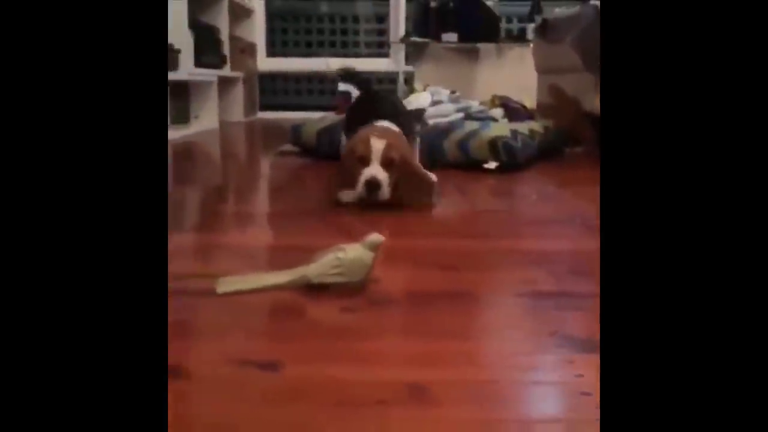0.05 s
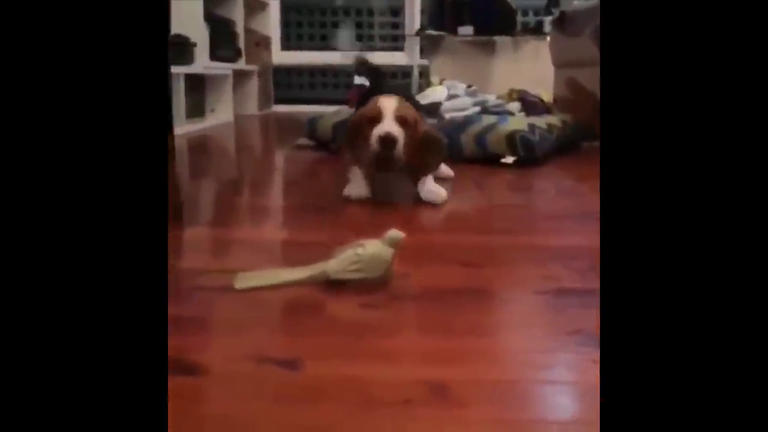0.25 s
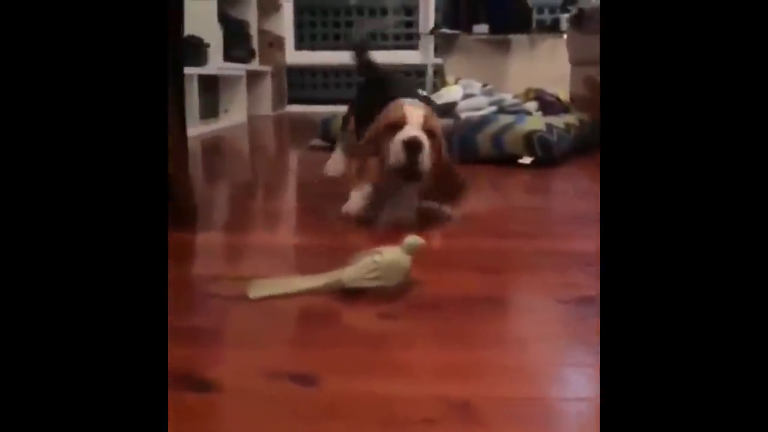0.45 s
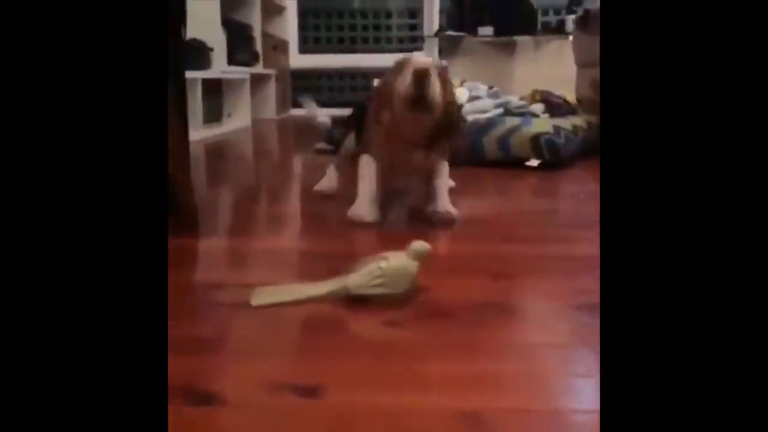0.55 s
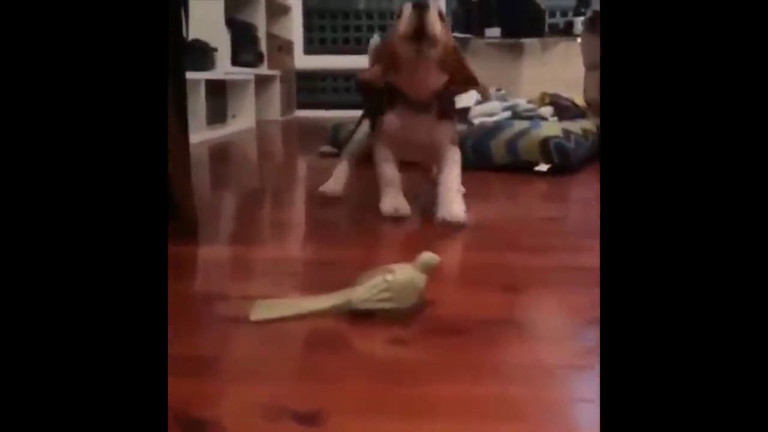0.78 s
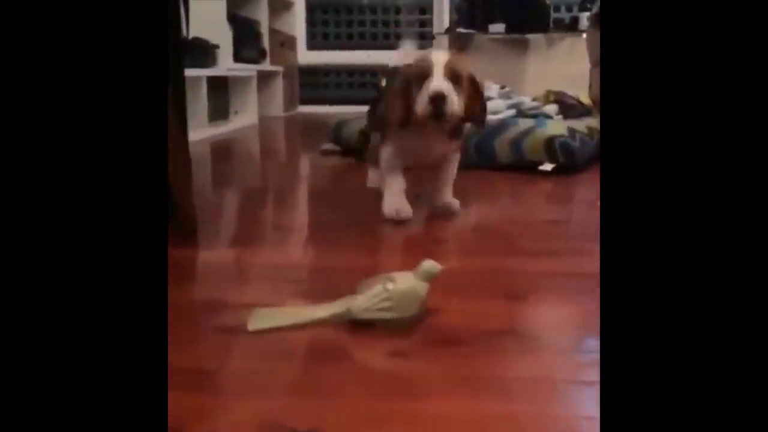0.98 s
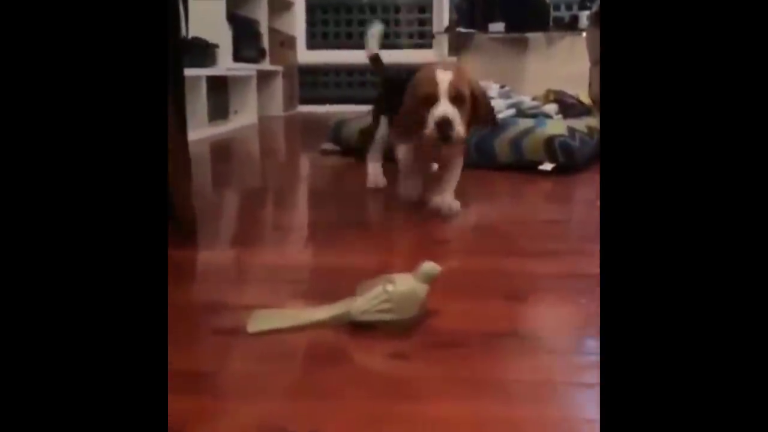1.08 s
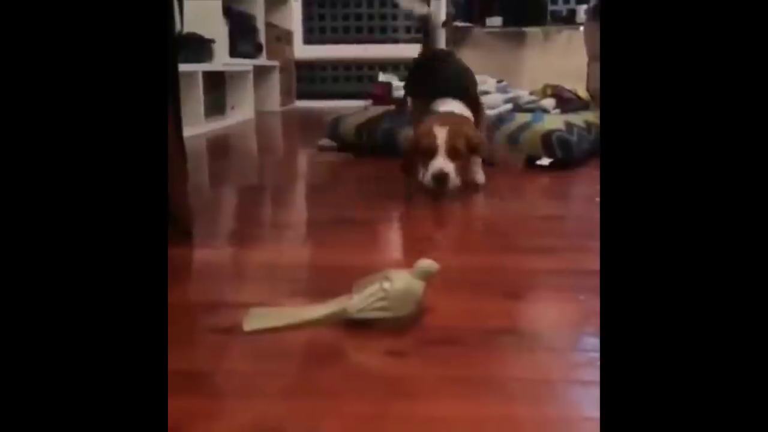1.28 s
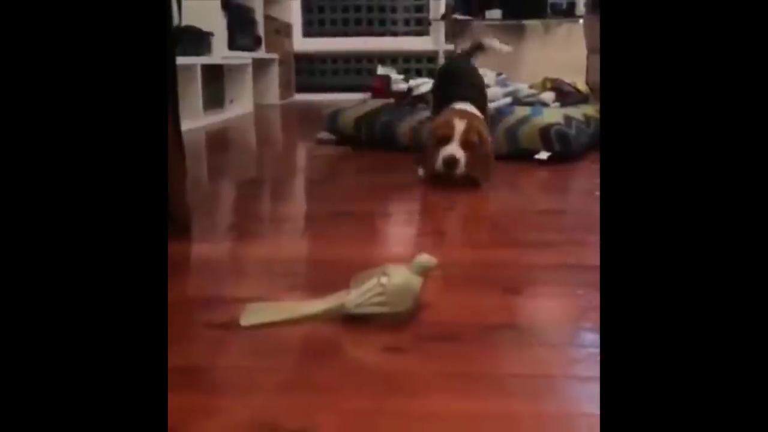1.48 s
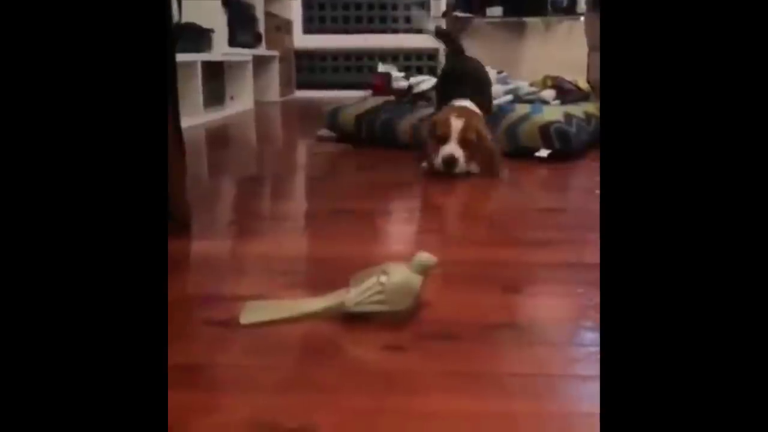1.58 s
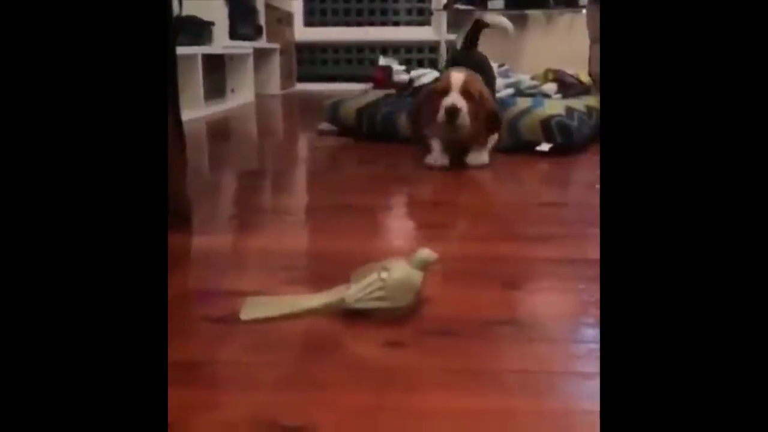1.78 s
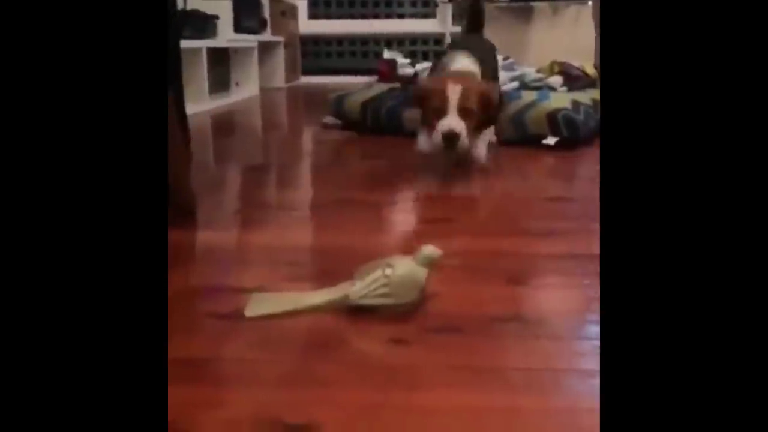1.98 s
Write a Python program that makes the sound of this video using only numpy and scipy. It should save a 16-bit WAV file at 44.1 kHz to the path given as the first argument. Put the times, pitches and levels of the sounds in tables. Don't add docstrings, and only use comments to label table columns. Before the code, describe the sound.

Puppy howl indoors: short gruff woof, loud rough bay sliding down, a sniff, quieter grumbling growls

```python
import sys
import numpy as np
from scipy import signal
from scipy.fft import rfft, irfft
from scipy.io import wavfile
from scipy.ndimage import uniform_filter1d, minimum_filter1d

SR = 44100
rng = np.random.default_rng(int(sys.argv[2]) if len(sys.argv) > 2 else 0)


def generate_wav(signal):
    frames = np.transpose(np.atleast_2d(signal))
    scaled = np.clip(frames, -1, 1) * 32767
    pcm = np.round(scaled).astype(np.int16)
    wavfile.write(sys.argv[1], SR, pcm)


def voltage_ratio(decibels):
    exponent = np.asarray(decibels, float) / 20
    return 10 ** exponent


N = 90404


def curve(table, col):
    rows = np.array(table, float)
    return np.interp(np.arange(N) / SR, rows[:, 0], rows[:, col])


def gate(table, edge=0.057):
    t = np.arange(N) / SR
    return np.clip(np.minimum(t - table[0][0], table[-1][0] - t) / edge + 1, 0, 1)


def read(points, hz):
    f, value = np.transpose(points)
    return np.interp(np.log(hz + 1), np.log(f + 1), value, right=-90)


def evened(x, size=None):
    power = np.mean(x ** 2) if size is None else abs(uniform_filter1d(x ** 2, size))
    return x / np.sqrt(power + 1e-18)


def coloured(points):
    spectrum = rfft(rng.standard_normal(N))
    return evened(irfft(spectrum * voltage_ratio(read(points, np.fft.rfftfreq(N, 1 / SR))), N))


def wobble(hz):
    low_pass = signal.butter(2, hz, fs=SR, output="sos")
    return evened(signal.sosfilt(low_pass, rng.standard_normal(N)))


def resonate(x, hz, width):
    turn = np.exp(2j * np.pi * np.cumsum(hz * np.ones(len(x))) / SR)
    r = np.exp(-np.pi * 1.5 * width / SR)
    smooth = signal.lfilter([(1 - r) ** 2], [1, -2 * r, r * r], x / turn + 1e-18)
    return 2 * (turn * smooth).real


def room_tone():
    # frequency in Hz, level in dB
    hum_colour = [(25, -9), (100, 2.5), (170, -7), (600, -17), (1300, -11), (2200, -28.5), (3300, -28.5),
                  (9300, -37)]
    duck_db = -3.5 * gate([(.5,), (1.15,)], edge=0.15)
    return voltage_ratio(-45 + duck_db + 0.83 * wobble(7.0)) * coloured(hum_colour)


def scuffs():
    # time in seconds, level in dB
    slide = [(0, -32), (.06, -36.5), (.11, -37), (.15, -49.5)]
    # frequency in Hz, level in dB
    slide_colour = [(150, -16.5), (250, -1), (850, -8.5), (1500, -9), (1900, -17), (3300, -18.5),
                    (5500, -26.5), (9300, -30)]
    return gate(slide) * voltage_ratio(curve(slide, 1) + 1.9 * wobble(21.0)) * coloured(slide_colour)


def paws():
    # start in seconds, level in dB, board pitch in Hz
    landings = [(.002, -16, 153.6), (0.051, -22, 97.6), (0.082, -28, 200), (0.128, -26, 95.1),
                (0.245, -18.5, 187), (0.288, -25, 69.3), (0.531, -24.5, 99), (0.648, -24, 190),
                (1.241, -41, 100), (1.508, -32, 179.4), (1.81, -24.5, 108), (1.856, -30.5, 102.6)]
    board_t60_s = 0.11
    out = np.zeros(N + SR)
    t = np.arange(SR // 3) / SR
    for s, db, hz in landings:
        ring = np.sin(2 * np.pi * hz * t)
        ring += 0.41 * np.sin(2 * np.pi * 1.6 * hz * t)
        ring += 0.27 * np.sin(2 * np.pi * 2.5 * hz * t)
        out[round(s * SR):][:len(t)] += voltage_ratio(db - 60 * t / board_t60_s) * np.minimum(t / 0.0034, 1) * ring
    return out[:N]


def growling(rows, hz, throat):
    # time in seconds, lift in dB, length in seconds
    gusts = [(.2, 6.5, 0.0083), (0.232, -0.5, 0.01), (0.279, 5, 0.032), (1.641, 8.5, 0.0072),
             (1.677, 10, 0.023), (1.714, 8, 0.0073), (1.794, 9.5, 0.0095), (1.826, 11, 0.014),
             (1.868, 14, 0.022), (1.944, 8.5, 0.018), (2.001, 8.5, 0.015)]
    jitter, alternation, noise_share = .11, .3, .3
    turns = np.cumsum(hz * (1 + jitter * np.clip(wobble(70.), -2, 2))) / SR
    cycle = turns.astype(int)
    size = (1 - alternation * (cycle % 2)) * rng.uniform(0.53, 1, N)[cycle]
    pulses = np.diff(cycle, prepend=0) * size
    puffs = evened((.7 + np.exp(-(turns % 1) / .3)) * size * rng.standard_normal(N))
    voiced = (1 - noise_share) * evened(pulses - pulses.mean()) + noise_share * puffs
    drift = 1 + .03 * wobble(6.)
    t = np.arange(N) / SR
    lift_db = sum(db * np.exp(-((t - s) / length) ** 2) for s, db, length in gusts)
    gusty = puffs * voltage_ratio(1.5 * wobble(20.)) * voltage_ratio(lift_db)
    out = np.zeros(N)
    for k, (f, width, db) in enumerate(throat):
        source = voiced if f < 1600 else gusty
        out += (-1) ** k * voltage_ratio(db) * resonate(source, f * drift, width)
    return gate(rows) * voltage_ratio(curve(rows, 1)) * evened(out, size=2500)


def woof():
    # time in seconds, level in dB
    woof_level = [
        (.175, -48.5),
        (.185, -36.5),
        (.232, -16),
        (.27, -15),
        (.3, -25.5),
        (.39, -39),
        (.45, -27),
    ]
    # frequency in Hz, width in Hz, level in dB
    woof_throat = [(200, 370, -12), (411, 170, -11), (652, 62, 1.5), (900, 350, -7.5), (2140, 246, -14.5),
                   (3100, 274, -18), (4800, 650, -36), (6040, 490, -35)]
    return growling(woof_level, 200, woof_throat)


def partial_db(k, hz, shut):
    # frequency in Hz, level in dB
    open_throat = [(190, -53.5), (480, 6), (1000, 5.5), (1500, -6.5), (2000, 1), (2450, -36), (3200, -38),
                   (4000, -62.5)]
    shut_throat = [(160, -15), (450, -15), (700, 0), (950, -12), (1230, -2), (1500, -18), (1850, -16),
                   (3500, -38)]
    # time in seconds, lowest partial in dB, tongue resonance in Hz, its lift in dB,
    # lift above 2300 Hz in dB
    mouth = [(.43, -5, 1300, 12, -1), (.49, -2.5, 1300, -1, 22.5), (.53, -10.5, 1440, 3.5, 12),
             (.57, -20, 1430, 25.5, 0.5), (.61, -10, 1490, -3, -3), (.7, -5.5, 1550, 6, 2.5),
             (.8, -11, 1515, 2.5, 5.5), (.9, 0, 1386, -7, 3), (1.06, -1, 1230, 5, -4.5)]
    # frequency in Hz, width in Hz, depth in dB
    nulls = [(961.2, 5.5, -8), (901.3, 4.8, -10.5), (885, 4.8, -6), (1412, 110, -13.5), (475, 19.5, -30),
             (506.6, 2.6, -15.5), (1918, 83, -17.5), (2228, 45, -39)]
    f = k * hz
    db = read(open_throat, f) + curve(mouth, 1) * (k < 1.2) + curve(mouth, 4) * (f > 2300)
    db += curve(mouth, 3) / (1 + ((f - curve(mouth, 2)) / 200) ** 2)
    db += sum(depth / (1 + ((f - null_hz) / width) ** 2) for null_hz, width, depth in nulls)
    return (1 - shut) * db + shut * read(shut_throat, f)


def torn_air(phase):
    # time in seconds, level in dB under the voice
    rasp_level = [(.43, -17), (.47, -10.5), (.51, -19), (.55, -17.5), (.59, -32.5), (.7, -31.5),
                  (.73, -38.5), (1.08, -63.5), (1.11, -25.5)]
    torn = rng.standard_normal(N) * (1 + np.cos(phase / 2)) * voltage_ratio(4.1 * wobble(97.0))
    rasp = voltage_ratio(2) * resonate(torn, 2360, 400) - resonate(torn, 2910, 210)
    rasp += voltage_ratio(-31.0) * resonate(torn, 5000, 1200) - voltage_ratio(-27.0) * resonate(torn, 8200, 730)
    hiss = voltage_ratio(-29.5) * resonate(rng.standard_normal(N), 8240, 1000)
    return hiss + voltage_ratio(curve(rasp_level, 1)) * evened(rasp)


def flapping():
    # time in seconds, rate in Hz, depth 0-1
    flap = [(.43, 170, .3), (.5, 170, .4), (.54, 180, .2), (.575, 195, .55), (.61, 200, .65),
            (.64, 262, .55), (.685, 265, .5), (.71, 265, 0)]
    depth = curve(flap, 2)
    turns = np.cumsum(curve(flap, 1) * (1 + .12 * wobble(50.))) / SR % 1
    return 1 - depth + depth * 2.5 * np.sin(np.pi * turns ** .6) ** 2


def bay():
    # time in seconds, pitch in Hz, level in dB,
    # brightness in dB per octave
    roar = [(.43, 425.4, -31.5, -5.5), (.465, 436.5, -18, 1), (.487, 415.6, -11, 2), (.522, 485.7, -7, -1),
            (.545, 470, -5, 9), (.572, 480.2, -7.5, 1), (.595, 521.8, -9.5, 8.5), (.625, 539.2, -9, 8.5),
            (.7, 530, -9.5, 8.5)]
    howl = [(0.721, 524.2, -11.5, 3.5), (.732, 515.2, -7, 5), (0.769, 502.5, -8.5, -5), (.8, 497.9, -5, -2),
            (0.831, 479, -9.5, -3.5), (0.844, 483, -19.5, -1), (0.852, 475, -16.5, 2.5),
            (0.877, 471, -15.5, 2.5), (0.901, 458.7, -29.5, 5),
            (0.914, 461, -12.5, 0.91), (0.931, 451.2, -24, 2.3), (0.953, 450.7, -24, 3.7),
            (.985, 448.7, -23.5, 3.3), (1.02, 452.3, -19, 8.5), (1.047, 438.3, -14, 6.1),
            (1.072, 440.7, -12.5, 10)]
    fall = [(1.086, 415, -19.5, 1.2), (1.102, 398.3, -10.5, 3.3), (1.118, 348.4, -10, 0.21),
            (1.13, 313.7, -14.5, 2), (1.142, 281.6, -22, 2), (1.167, 231.6, -20.5, 0.36),
            (1.181, 190, -23.5, 0.53), (1.198, 174, -30.5, 0.38), (1.23, 163, -37, 1.1)]
    # time in seconds, flutter 0-1, strong-weak alternation 0-1
    folds = [(.43, .45, .2), (.49, .35, .3), (.53, .18, .2), (.58, .24, .25), (.62, .16, .25),
             (.69, .1, .2), (.72, .025, .02), (1.085, .015, 0), (1.12, .32, .1)]
    rows = roar + howl + fall
    hz, bright = curve(rows, 1), curve(rows, 3)
    flutter, alternate = curve(folds, 1), curve(folds, 2)
    phase = 2 * np.pi * np.cumsum(hz * (1 + .05 * flutter * wobble(60.))) / SR
    shut = np.clip((400 - hz) / (400 - 362), 0, 1) * (np.arange(N) > SR)
    voice = np.zeros(N)
    for k in np.r_[np.arange(2, 17) / 2, 9:19]:
        half_step = k % 1 > 0
        db = partial_db(k, hz, shut) + bright * np.maximum(np.log2(k * hz / 700), 0)
        rough = .6 if half_step else flutter * min(k / 3, 1.3)
        shake = 1 - rough + rough * (wobble(110.) + 1j * wobble(110.))
        tone = (shake * np.exp(1j * (k * phase + 6 * rng.random()))).real
        voice += (alternate if half_step else 1) * voltage_ratio(db) * tone
    chop = flapping()
    return gate(rows) * voltage_ratio(curve(rows, 2)) * (evened(chop * voice, size=900) + chop * torn_air(phase))


def claws():
    # start in seconds, level in dB, ring in Hz; the row at 1.477 s is the burst in the breath
    ticks = [(0.5031, -25, 7600), (0.5281, -20.5, 4300), (0.5452, -20.5, 4570), (0.568, -31.5, 4000),
             (0.585, -35, 3830), (0.6124, -19, 5520), (0.6453, -27, 4500), (0.666, -26.5, 4800),
             (0.677, -33, 4500), (1.318, -52, 5000), (1.352, -46, 2514), (1.477, -26, 1330),
             (1.64, -38, 3420)]
    claw_t60_s, snap_db = .018, -7.5
    out = np.zeros(N + SR)
    t = np.arange(SR // 3) / SR
    for s, db, hz in ticks:
        tick = evened(resonate(rng.standard_normal(len(t)), hz, hz / 2))
        out[round(s * SR):][:len(t)] += voltage_ratio(db - 60 * t / claw_t60_s) * np.minimum(t / 0.0015, 1) * tick
        out[round(s * SR):][:2] += voltage_ratio(db + snap_db) * np.array([1, -1])
    return out[:N]


def breath():
    # time in seconds, level in dB
    breath_level = [
        (1.38, -81),
        (1.43, -48.5),
        (1.475, -43),
        (1.54, -46),
        (1.58, -87),
    ]
    # frequency in Hz, width in Hz, level in dB
    breath_throat = [(1261.4, 595, 33.5), (1580, 670, -1), (3320, 360, 29), (4100, 700, -34),
                     (5340, 1300, 19.5)]
    air = rng.standard_normal(N) * voltage_ratio(1.8 * wobble(48.0))
    out = sum(voltage_ratio(db) * resonate(air, f, width) for f, width, db in breath_throat)
    return gate(breath_level) * voltage_ratio(curve(breath_level, 1)) * evened(out)


def growl():
    # time in seconds, level in dB
    growl_level = [(1.6, -65), (1.642, -32.5), (1.72, -23.5), (1.775, -27.5), (1.79, -24), (1.84, -29.5),
                   (1.87, -29.5), (1.93, -35.5)]
    # frequency in Hz, width in Hz, level in dB
    growl_throat = [(190, 53, 1.5), (369, 104, 4.5), (507.6, 49, 8.5), (737.6, 50, 10.5), (869, 29, 5),
                    (1180, 417, -3), (2385, 196, -17), (3500, 800, -19), (5750, 760, -27.5),
                    (7600, 2500, -42)]
    return growling(growl_level, 176.6, growl_throat)


def grumble():
    # time in seconds, level in dB
    grumble_level = [
        (1.925, -37.5),
        (1.945, -32),
        (2.05, -32.5),
    ]
    # frequency in Hz, width in Hz, level in dB
    grumble_throat = [(470, 210, -4.5), (868, 74, 7.5), (1270, 235, -5.5), (2800, 330, -10),
                      (4370, 350, -36), (6360, 510, -39), (8450, 260, -38.5)]
    return growling(grumble_level, 211.3, grumble_throat)


def room(x):
    room_t60_s = .24
    taps = np.zeros(SR // 2)
    at = np.arange(250, len(taps) - 22, 22)
    taps[at + rng.integers(0, 22, len(at))] = rng.choice([-1., 1.], len(at))
    taps = signal.lfilter([.4], [1, -.6], taps) * voltage_ratio(-60 * np.arange(len(taps)) / SR / room_t60_s)
    return signal.fftconvolve(x, taps / np.linalg.norm(taps))[:N]


def scene():
    voice = bay()
    near = scuffs() + paws() + woof() + claws() + breath() + growl() + grumble()
    echo = room(voltage_ratio(-19) * voice + voltage_ratio(-9.5) * near)
    return (voice + near + echo + room_tone())[None]


def drop_faint_bands(x):
    under_db, near_db, floor_db, chance_db = 62, 25, -90, 6
    z = signal.stft(x, nperseg=1024, noverlap=512)[2]
    bands = z[:512].reshape(128, 4, -1)
    chance = evened(uniform_filter1d(rng.standard_normal(bands.shape[::2]), size=3, axis=1))
    db = 10 * np.log10((abs(bands) ** 2).mean(axis=1) + 1e-14) + chance_db * chance
    near = -minimum_filter1d(-db, size=7, axis=0) - near_db
    far = np.maximum(db.max(axis=0) - under_db, floor_db)
    lowest = (np.arange(128) < 12)[:, None]
    keep = (db > np.maximum(near, far)) | lowest
    z = z * np.repeat(keep, 4, axis=0)[np.r_[:512, 511]]
    return signal.istft(z, nperseg=1024, noverlap=512)[1][:N]


def top_cut(x):
    return signal.sosfilt(signal.butter(12, 15500, fs=SR, output="sos"), x)


def record(dry):
    # frequency in Hz, level in dB
    mic = [(20, -6), (60, 0), (9100, 0), (9700, -7), (12000, -8), (12500, -24), (22050, -40)]
    knee = dry / (1 + abs(dry / .955) ** 14) ** (1 / 14)
    heard = irfft(rfft(knee[0]) * voltage_ratio(read(mic, np.fft.rfftfreq(N, 1 / SR))), N)
    return top_cut(drop_faint_bands(heard)[None])


dry = scene()
out = record(dry)
generate_wav(out)
```